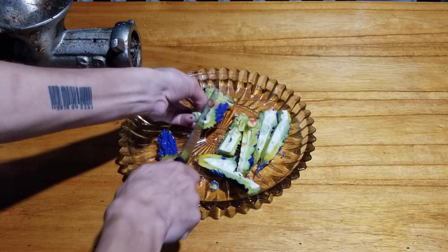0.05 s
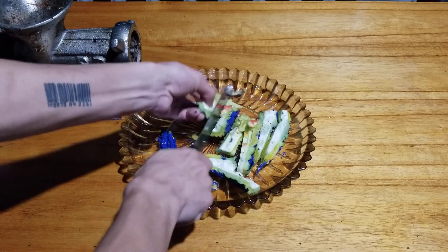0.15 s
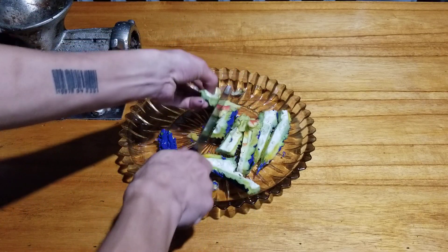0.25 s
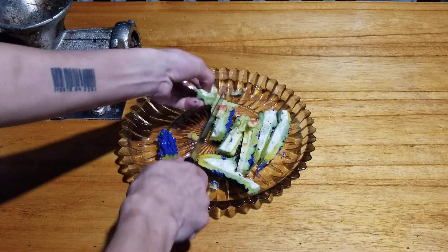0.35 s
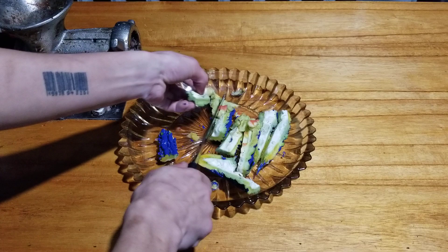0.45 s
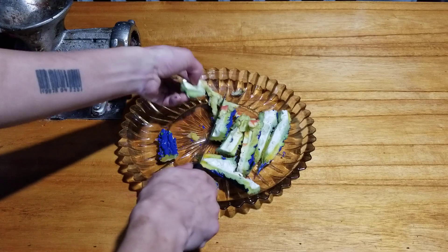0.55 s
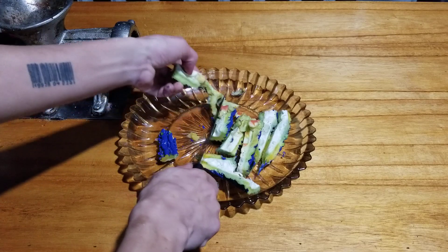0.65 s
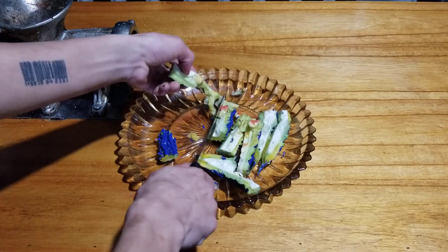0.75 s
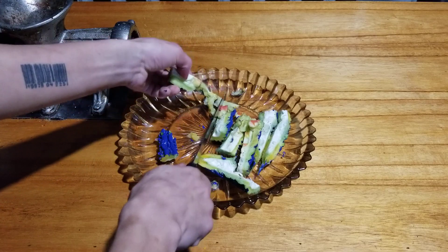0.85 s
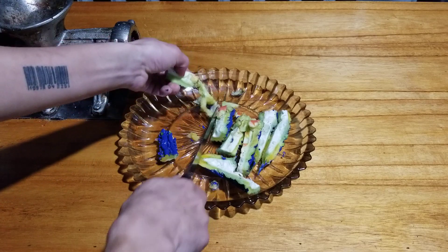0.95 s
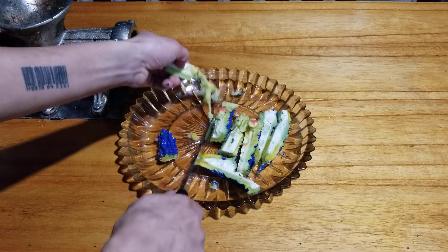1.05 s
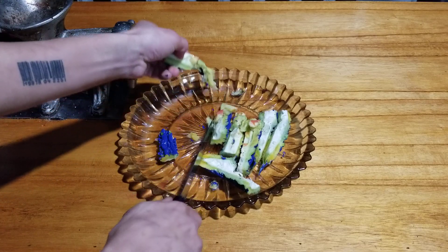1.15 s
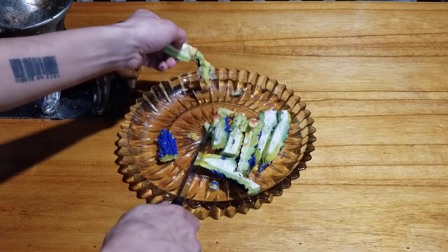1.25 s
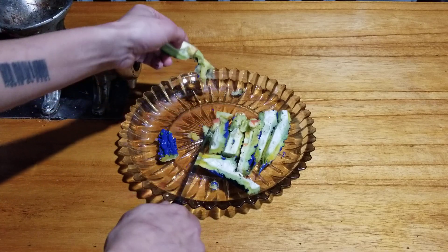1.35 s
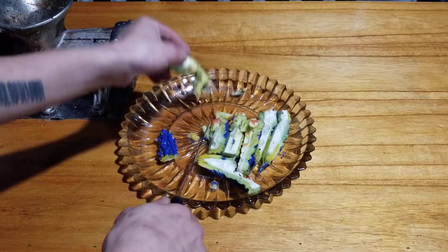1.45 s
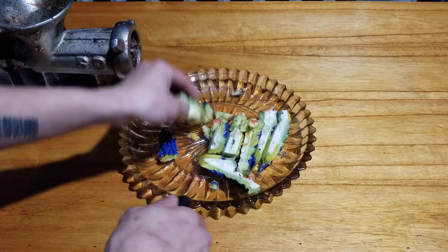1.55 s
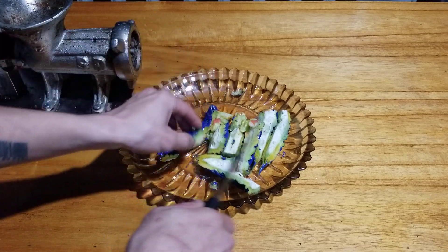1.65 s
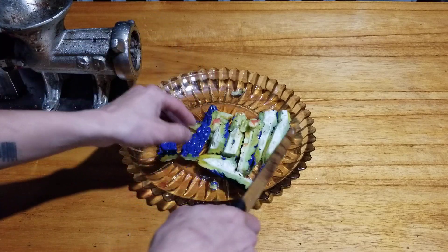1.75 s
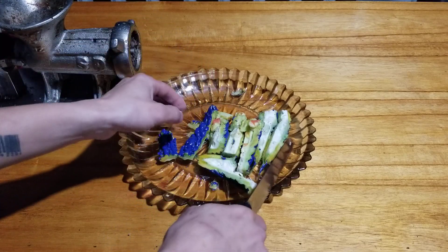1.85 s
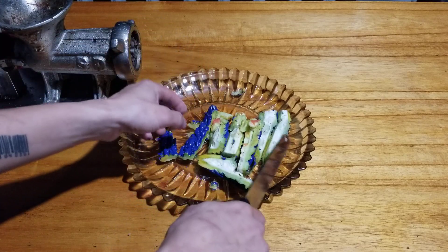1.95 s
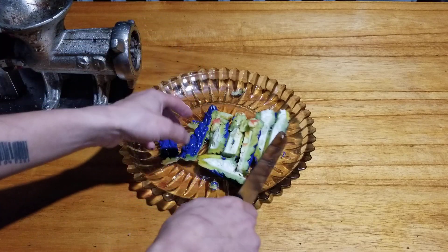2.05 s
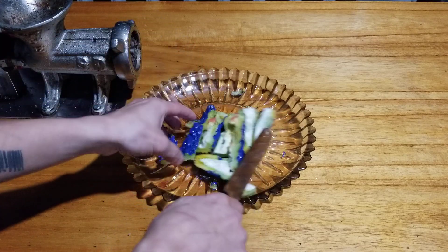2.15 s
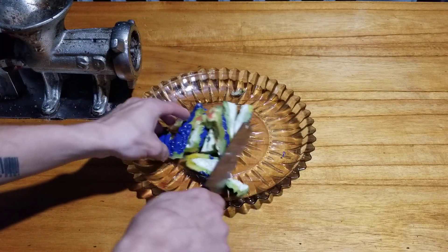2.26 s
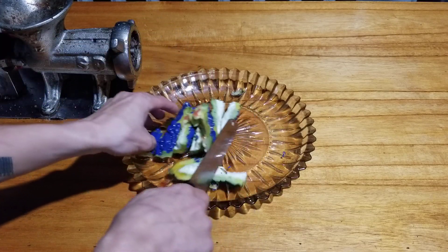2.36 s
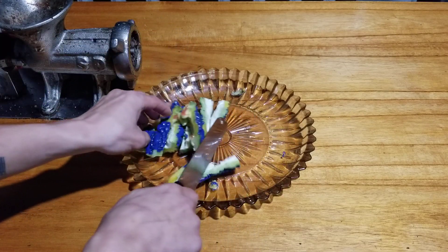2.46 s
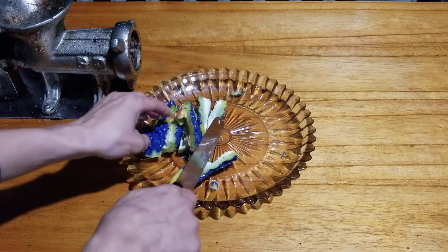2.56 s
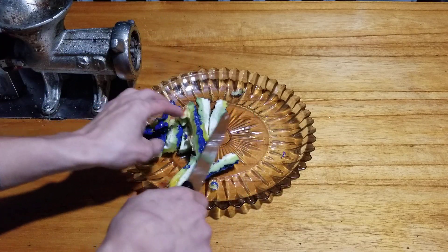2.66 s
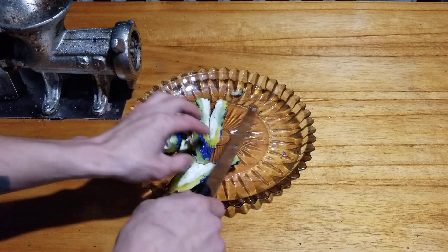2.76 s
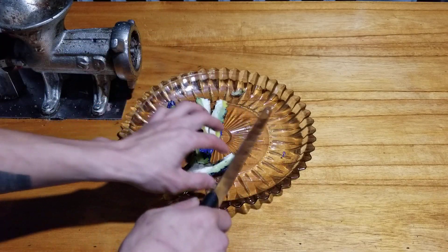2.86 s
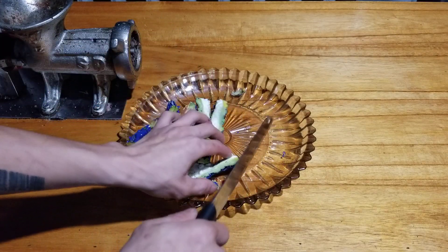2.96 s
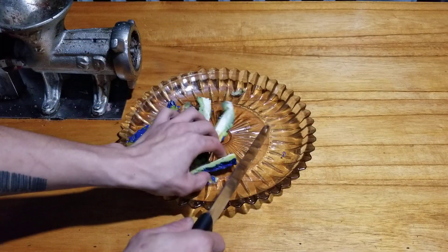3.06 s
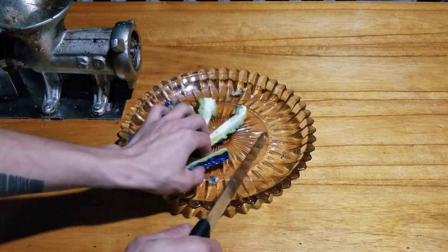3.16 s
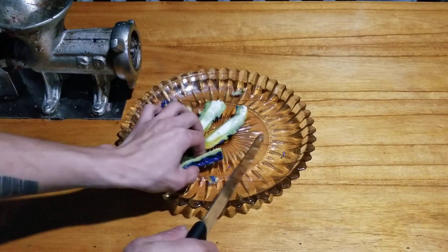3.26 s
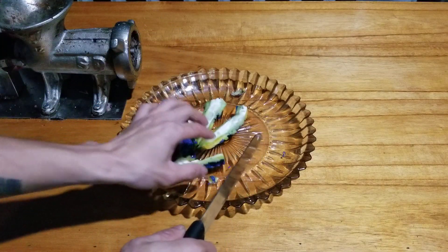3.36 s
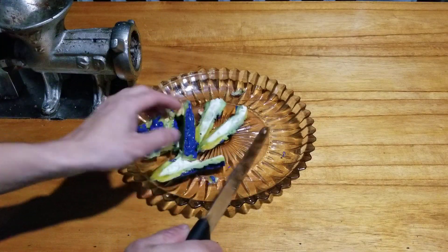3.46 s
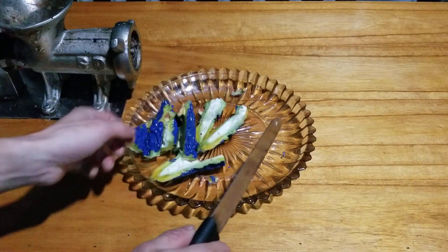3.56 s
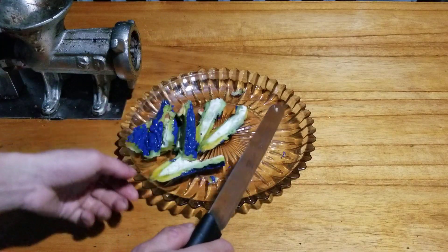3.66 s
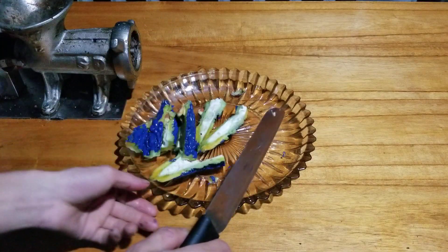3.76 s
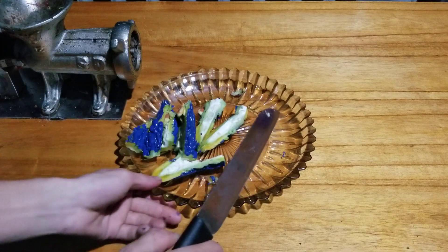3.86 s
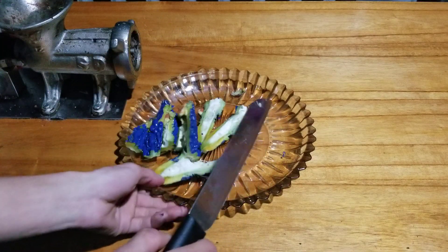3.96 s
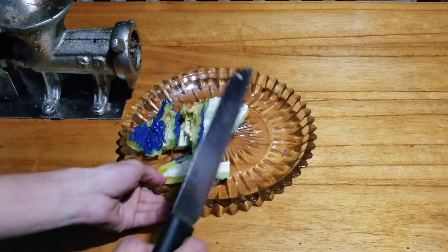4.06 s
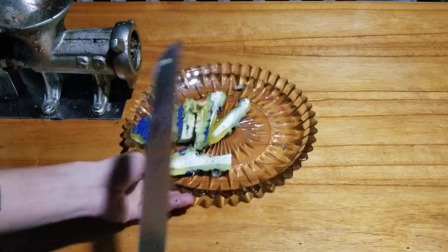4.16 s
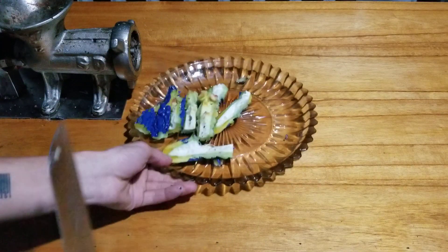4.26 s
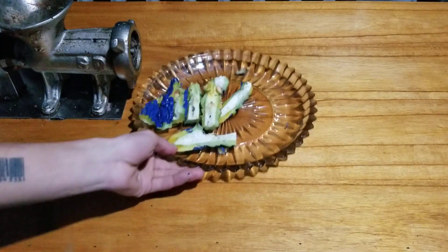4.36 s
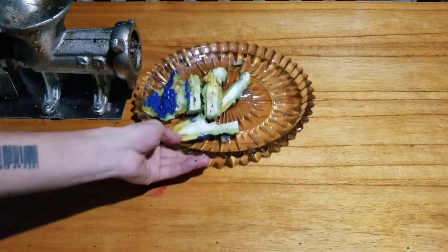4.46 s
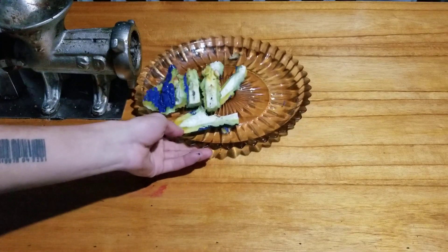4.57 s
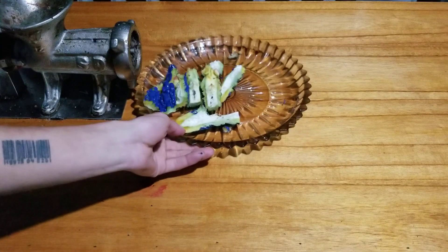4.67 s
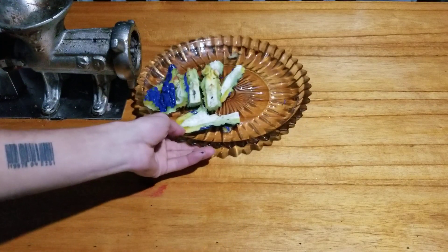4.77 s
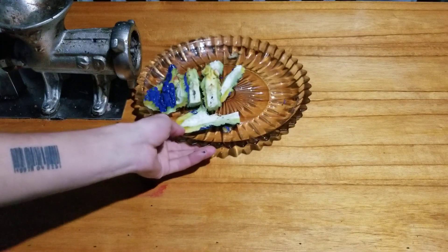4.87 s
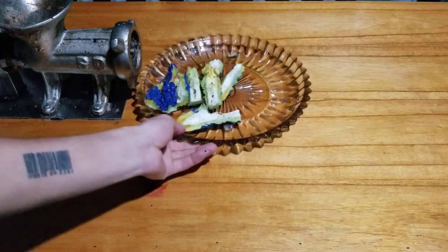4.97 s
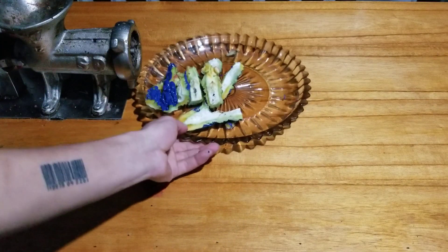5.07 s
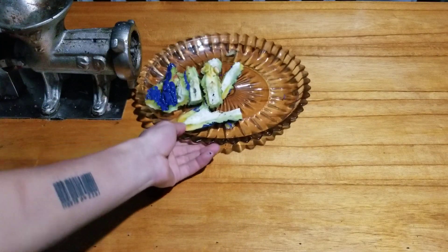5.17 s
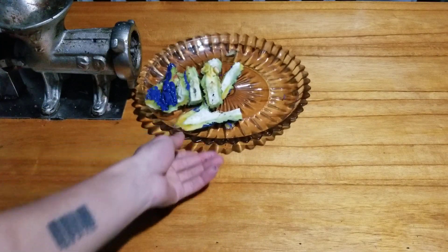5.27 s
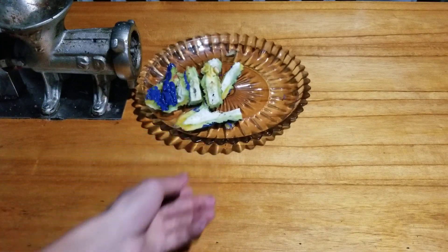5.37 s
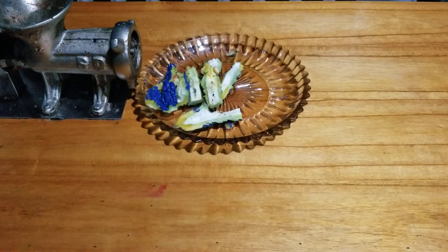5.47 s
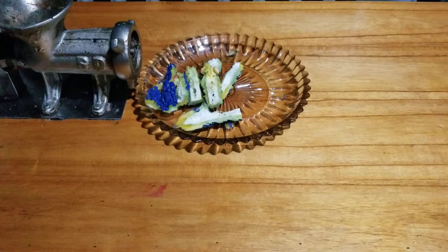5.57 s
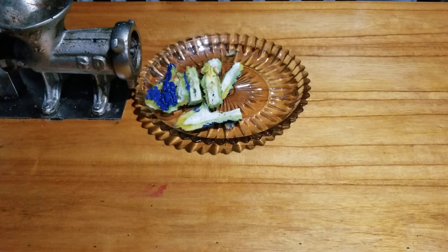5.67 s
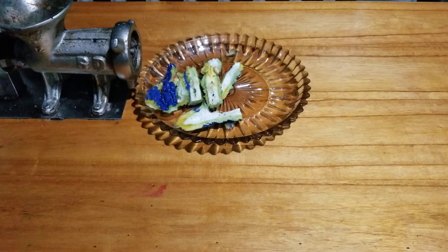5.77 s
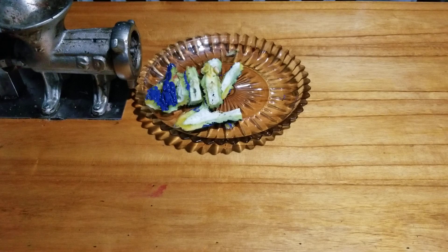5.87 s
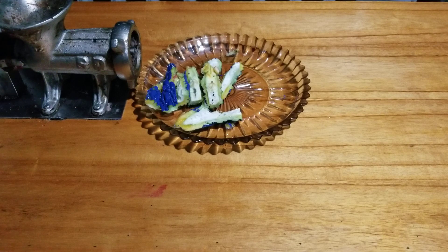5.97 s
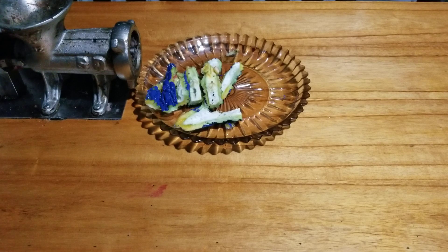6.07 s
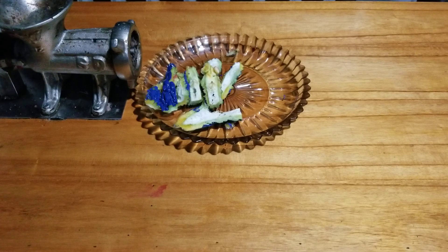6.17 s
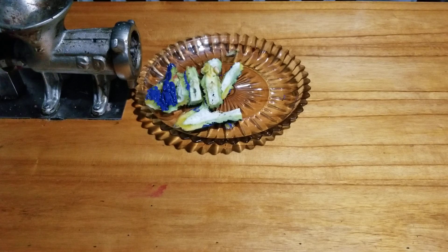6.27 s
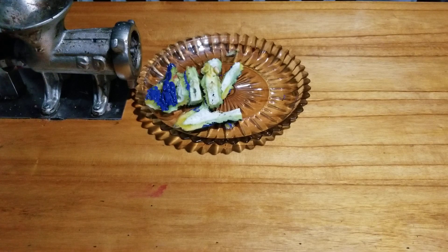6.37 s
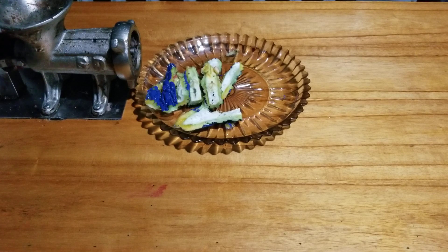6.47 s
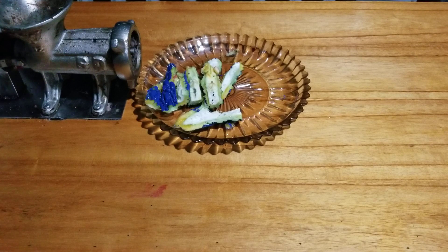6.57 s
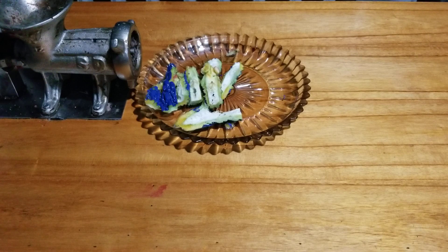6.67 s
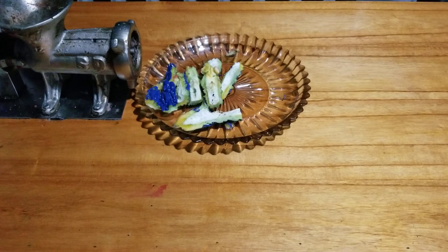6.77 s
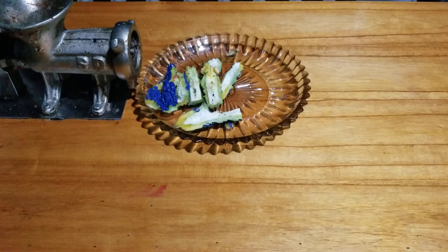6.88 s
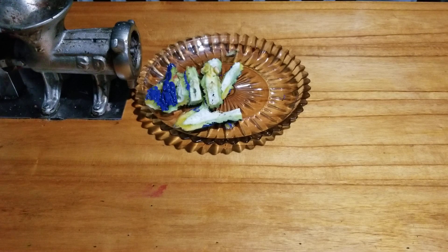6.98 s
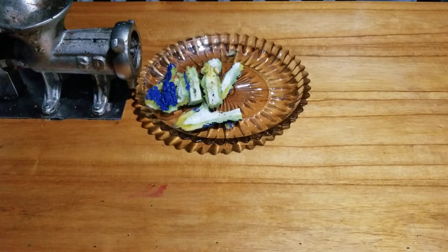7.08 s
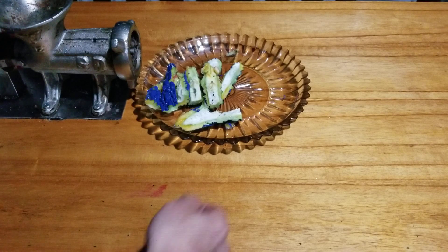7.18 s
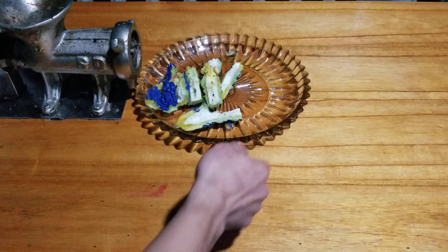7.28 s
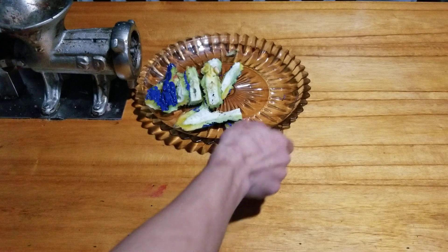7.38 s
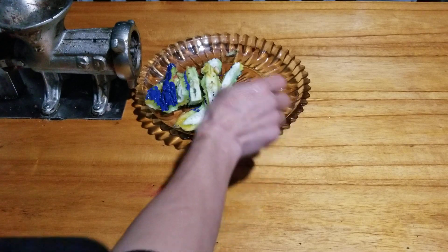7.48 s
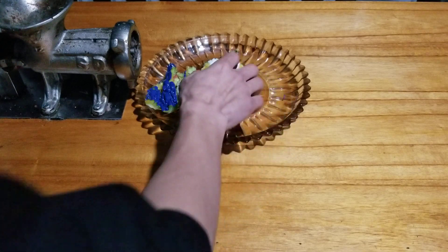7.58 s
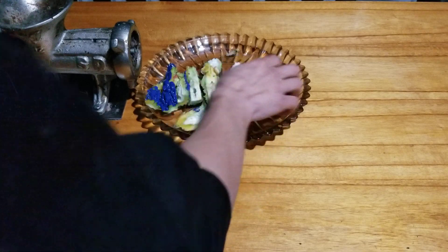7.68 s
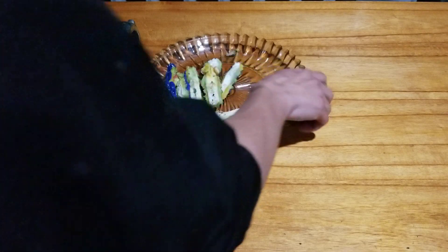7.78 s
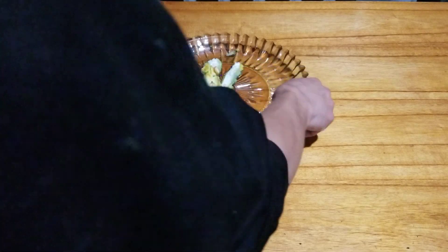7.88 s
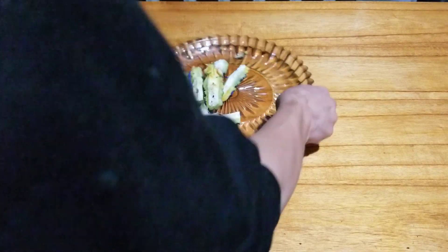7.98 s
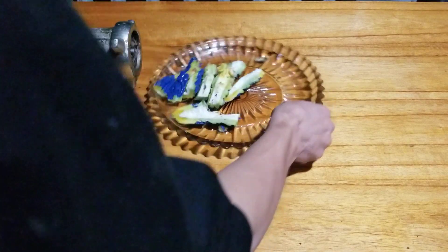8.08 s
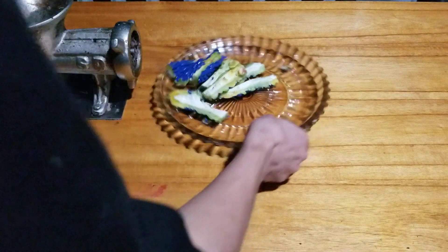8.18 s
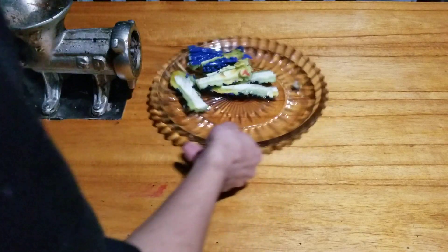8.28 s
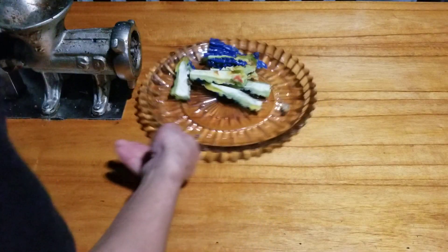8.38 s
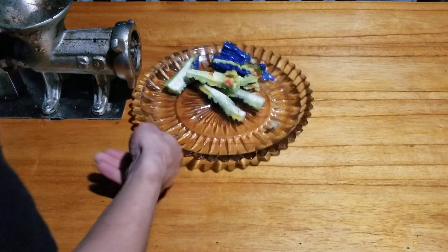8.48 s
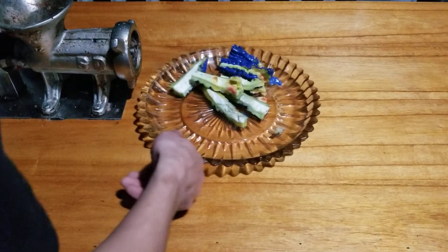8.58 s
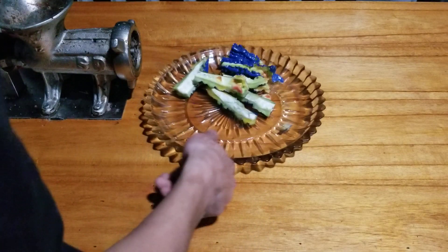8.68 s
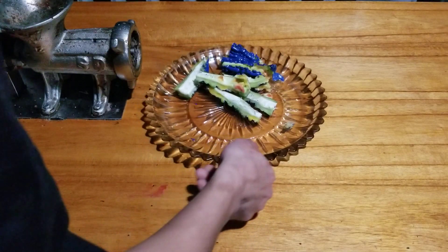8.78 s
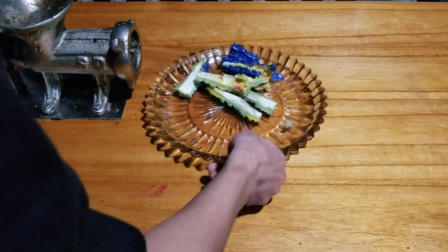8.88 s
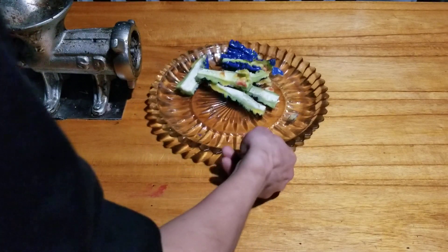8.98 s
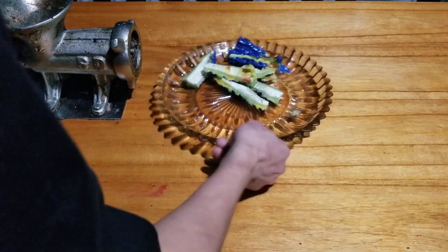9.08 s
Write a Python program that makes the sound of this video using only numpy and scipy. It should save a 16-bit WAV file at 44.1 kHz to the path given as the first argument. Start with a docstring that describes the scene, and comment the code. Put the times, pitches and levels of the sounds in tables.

```python
"""A bright clink opens the scene: a knife cuts through vegetables onto a pressed-glass plate.
In a quiet kitchen the plate is pushed aside on its wooden table and the knife is laid down; then the
plate is dragged round, juddering by stick-slip friction, and bumps to a stop. Each impact excites
damped modes of the table top and of the glass or the blade, and the small room reverberates."""
import sys
import numpy as np
from scipy import signal
from scipy.fft import rfft, irfft, next_fast_len
from scipy.io import wavfile
from scipy.ndimage import uniform_filter1d

SR = 44100
rng = np.random.default_rng(int(sys.argv[2]) if len(sys.argv) > 2 else 0)


def wav_out(sig):
    """Save sig, one row per channel (or a flat mono array), as 16-bit PCM at SR to the path in sys.argv[1]."""
    wavfile.write(sys.argv[1], SR, np.round(np.clip(np.atleast_2d(sig).T, -1, 1) * 32767).astype(np.int16))


N = 403074
T = np.arange(24000) / SR  # time axis of one short sound [s]

# Levels are relative. A strike point favours the modes near its "spot" frequency by its "spot gain".
# blade meets plate: (time [s], glass ring [dB], table boom [dB], wood knock [dB], clack [dB],
# tick [dB], spot [Hz], spot gain [dB])
CUTS = [(0.0995, -16.5, -31.5, -23.5, -34, -32.5, 3450, 2.5), (1.0, -57.5, -64, -60.5, -66, -75, 2170, -1),
        (1.895, -39.5, -38, -42, -45, -43, 2610, 16), (2.007, -47.5, -47, -56, -70, -62, 3350, 7),
        (2.161, -38.5, -42.5, -57, -68, -49.5, 3500, 13.5), (4.187, -49, -36.5, -37, -54, -53, 1000, 4)]
# bumps on the table, mostly the plate, though the thud at 7.841 s is a body knocking against it: (time [s],
# force [dB], ring over knock [dB], spot [Hz], spot gain [dB])
PLATE_BUMPS = [(2.975, -55.5, -17.5, 310, 5), (4.286, -35, -29, 487, 4.5), (4.574, -24.5, -7, 3100, 12),
               (5.183, -36, -11.5, 3110, 15), (7.841, -31, -30, 233.5, 19.5), (8.038, -31.5, -24, 380, 9.5),
               (8.117, -32.5, -20.5, 465, -1), (8.184, -24, -33, 900, 5), (8.241, -18, -34, 500, 2),
               (8.292, -19, -19.5, 790, 9), (8.331, -16.5, -22.5, 900, 1), (8.389, -20.5, -15, 510, 7),
               (8.444, -15.5, -2.5, 3060, 12), (8.457, -10, -9, 2880, 10), (8.500, -12.5, -9, 3700, 5),
               (8.511, -11.5, -12, 1290, 28), (8.526, -17, -13, 312, 8), (8.971, -41, -24, 885, -6)]
# knife clicks in the hand, then is laid down: (time [s], blade ring [dB], wood knock [dB],
# handle clack [dB], tick [dB], spot [Hz], spot gain [dB], left over right [dB])
KNIFE_TAPS = [(3.773, -52.5, -63, -39.5, -62, 2200, 1, 2), (5.9641, -40.5, -46, -45.5, -51.5, 980, 13.5, 2),
              (6.145, -39.5, -36.5, -61, -43, 565, 0, -3), (6.168, -40.5, -46.5, -48, -44.5, 1120, 2, 5.5),
              (6.267, -36, -35.5, -49, -32.5, 5680, 13, 11), (6.276, -28.5, -33.5, -22.5, -45, 666, 19, 2),
              (6.297, -36.5, -28.5, -45, -30.5, 11400, 8.5, 3)]
# pushes that slide the plate: (start [s], hardest moment [s], end [s], peak force [dB])
PUSHES = [(4.04, 4.206, 4.25, -39.5), (4.29, 4.396, 4.57, -34), (8.02, 8.1, 8.18, -34),
          (8.189, 8.37, 8.425, -18), (8.838, 8.904, 8.97, -47.5), (9.078, 9.106, 9.2, -43.5)]
# brushes of blade, vegetables and hands: (time [s], time to fall 30 dB [s], level [dB], centre [Hz])
BRUSHES = [(0.048, 0.16, -42, 4400), (0.969, 0.2, -63.5, 5000), (1.512, 0.29, -53, 4330),
           (1.93, .12, -62, 12000), (2.179, 0.18, -56, 8000), (3.605, 0.33, -52.5, 1090),
           (4.95, 0.4, -58.5, 4600), (5.08, 0.054, -47.5, 1890), (5.324, 0.22, -52.5, 5450),
           (5.48, 0.18, -52, 7500), (6.037, 0.3, -48.5, 6300), (7.47, 0.2, -54.5, 3870),
           (7.865, 0.28, -59, 7400), (7.981, 0.12, -48.5, 2900)]
# hands lean and shift on the table: (start [s], end [s], level [dB])
HAND_SPELLS = [(0, 1.6, -65.5), (1.7, 3.6, -59), (4.15, 5.6, -54.5), (7.95, 8.92, -50)]
# the background dips and returns: (time [s], level [dB])
BACKGROUND_LEVEL = [(0, 3.5), (.85, -6.5), (1.699, 2), (3.4, 2), (5.8, 4.5), (8.2, 2.5), (8.7, -4.5)]

# modes of plate, knife and table top (above its lowest): (frequency [Hz], level [dB], t60 [s])
GLASS_MODES = [(791, -6, 0.29), (1259, -7.5, 0.29), (1893, 3.5, 0.18), (2086, -0.5, .32), (2610, -13, 0.17),
               (2913, -8.5, 0.16), (3060, 0, 0.069), (3365, 1, 0.16), (3280, -14.5, 0.21),
               (3640, -1.5, 0.096), (4270, -8, 0.24), (4870, -9, .2), (4970, -3, 0.097), (5170, -9, .2),
               (5280, -5.5, 0.18), (5480, -7, 0.25), (6430, -12.5, 0.19), (7000, -4, 0.46),
               (8280, -5.5, 0.39), (8860, -4.5, 0.083), (11400, -6.5, .2), (11700, -10.5, 0.24),
               (13000, -10.5, .2), (14200, -8, 0.12)]
STEEL_MODES = [(564, 9, 0.5), (667, -1.5, 0.26), (972, -10, 0.76), (1070, 4.5, 0.45), (2180, 5.5, 0.3),
               (3390, 0.5, 0.25), (2760, 3.5, 0.16), (5020, 2, 0.3), (5600, -0.5, 0.16), (6360, 3.5, 0.18),
               (7300, -6, 0.24), (9900, -1, 0.091), (10500, -5, 0.14), (11280, -3, 0.17), (12000, 0, .19),
               (13600, 4, .17), (14400, -9, .17)]
WOOD_MODES = [(170.2, -4, 0.17), (195.8, -11, 0.5), (234.4, -5.5, 0.43), (275, -4.5, 0.26),
              (307.6, 2.5, 0.17), (341.6, -6.5, 0.31), (385.5, -1.5, 0.22), (436, -7, 0.28),
              (478, -1, 0.18), (502.4, -2.5, 0.23), (555.7, -5.5, 0.27), (605, -9.5, 0.15),
              (692, -10, 0.26), (719, -9.5, 0.27), (831, -14.5, 0.3), (862, -10.5, .28), (927, -9.5, 0.27),
              (1149, -19.5, 0.35)]
# spectra of the dense, unresolved modes in each contact sound: (frequency [Hz], density [dB])
KNOCK_SPECTRUM = [(40, -44.5), (80, -14.5), (170, -4), (250, -5), (340, 0), (500, -10), (800, -18),
                  (1200, -21.5), (2000, -32), (5000, -58), (16000, -87.5)]
CLACK_SPECTRUM = [(100, -32.5), (400, -10), (900, 2), (1400, 2), (2200, -3.5), (3200, -10), (4500, -18),
                  (8000, -33.5), (16000, -43)]
CHINK_SPECTRUM = [(300, -31.5), (1500, -29.5), (2000, -4.5), (3200, 8), (3900, -0.5), (4500, -11.5),
                  (5600, -13), (7000, -14), (9000, -23.5), (16000, -46)]
TICK_SPECTRUM = [(500, -24.5), (3000, -7), (7000, 4), (9500, -3.5), (12300, 2), (15000, -1.5),
                 (16500, -10.5)]
GRIT_SPECTRUM = [(300, -9), (1200, -1.5), (2200, 0), (3400, -2.5), (4500, -6.5), (8000, -14.5),
                 (12000, -26), (16000, -36)]
# spectra of the room's noise and the hands' rumble: (frequency [Hz], density [dB])
ROOM_SPECTRUM = [(15, -52.5), (25, -13), (111, -3.5), (145, -9.5), (212, -12.5), (285, -21), (335, -14.5),
                 (384, -18.5), (734, -16), (1700, -15.5), (2000, -12.5), (2990, -11), (3620, -18.5),
                 (4030, -17.5), (16000, -36)]
HAND_SPECTRUM = [(15, -26.5), (35, -5.5), (80, -11.5), (118, 1.5), (170, -13), (300, -16), (700, -16.5),
                 (2000, -49)]
# likeness of the sound at the two ears: (frequency [Hz], correlation [0-1])
COHERENCE = [(30, 1), (120, 0.95), (300, 0.97), (600, 0.6), (1200, 0.03), (3000, 0.048), (16000, .1)]


def gain_of(db):
    """Amplitude grows tenfold for every 20 dB."""
    return 10 ** (np.asarray(db) / 20)


def value_at(points, hz):
    """Interpolation of a table on a logarithmic frequency axis."""
    table_hz, value = np.transpose(points)
    return np.interp(np.log(hz + 1), np.log(table_hz + 1), value)


def unit_rms(x):
    """Normalisation to unit mean power."""
    return x / np.sqrt(np.mean(x ** 2) + 1e-20)


def unit_hit(x):
    """Normalisation to unit mean power over the first 40 ms."""
    return x / np.sqrt(np.mean(x[:, :SR // 25] ** 2) + 1e-20)


def steadied(x, seconds):
    """Division by the running rms removes slow swells and keeps fast judder."""
    power = uniform_filter1d((x ** 2).mean(0), int(seconds * SR))
    return x / np.sqrt(abs(power) + 1e-12)


def add(mix, start, sound):
    """Superposition: a stereo sound joins the mix at its start time."""
    part = mix[:, max(round(start * SR), 0):][:, :sound.shape[1]]
    part += sound[:, :part.shape[1]]


def pan(left_db):
    """A level difference between the ears places a source to one side."""
    return gain_of(np.array([[left_db], [-left_db]]) / 2)


def noise(spectrum, length):
    """Diffuse noise is coherent between the ears only at long wavelengths."""
    size = next_fast_len(length)
    hz = np.fft.rfftfreq(size, 1 / SR)
    left, independent = rfft(rng.standard_normal((2, size)))
    coherence = value_at(COHERENCE, hz)
    right = coherence * left + np.sqrt(1 - coherence ** 2) * independent
    coloured = np.array([left, right]) * gain_of(value_at(spectrum, hz))
    return unit_rms(irfft(coloured, size)[:, :length])


def background(hiss_db=-58.5, whine_hz=3990, whine_db=-71.5, flicker_db=0.5, flicker_s=0.13):
    """Broadband noise is heard as room rumble and hiss, a narrow band as a thin, flickering whine."""
    band = [(.93, -90), (.975, -7), (1, 0), (1.025, -7), (1.07, -90)]
    whine = noise([(whine_hz * ratio, db) for ratio, db in band], N)
    flicker = unit_rms(uniform_filter1d(rng.standard_normal(N), int(flicker_s * SR)))
    air = gain_of(hiss_db) * noise(ROOM_SPECTRUM, N) + gain_of(whine_db + flicker_db * flicker) * whine
    level_db = np.interp(np.arange(N) / SR, *np.transpose(BACKGROUND_LEVEL))
    return air * gain_of(level_db) * pan(2.9)


def handling(fade_s=0.51):
    """Structure-borne noise: a low rumble fades in and out as the hands work on the table."""
    t = np.arange(N) / SR
    weight = sum(gain_of(db) * (t >= start) * (t < end) for start, end, db in HAND_SPELLS)
    return uniform_filter1d(weight, int(fade_s * SR)) * noise(HAND_SPECTRUM, N)


def brushing(rise_s=0.026, graininess=0.15):
    """Light friction makes grainy swishes of noise that swell and fade."""
    out = np.zeros((2, N))
    for start, decay_s, db, hz in BRUSHES:
        envelope = np.minimum(T / rise_s, 1) ** 2 * gain_of(-30 * np.maximum(T - rise_s, 0) / decay_s)
        grains = np.exp(graininess * unit_rms(uniform_filter1d(rng.standard_normal(len(T)), size=60)))
        swish = noise([(hz / 10, -22), (hz / 2, -5), (hz, 0), (hz * 2, -9), (hz * 4, -22)], len(T))
        add(out, start, gain_of(db) * envelope * grains * swish)
    return out * pan(1.5)


def burst(spectrum, direct_t60, room_db, room_t60):
    """Overlapping modes merge into a crack of noise; direct and reverberant powers add."""
    power = gain_of(-120 * T / direct_t60) + gain_of(2 * room_db - 120 * T / room_t60)
    attack = 1 - np.exp(-T / 0.00028)
    return unit_hit(noise(spectrum, len(T)) * np.sqrt(power) * attack)


def ring(modes, corner_hz, spot_hz=1, spot_db=0, scatter_db=3.0, blur=0.65, bite=0):
    """Free vibration is a sum of damped modes: soft contact dulls them, reflections blur them."""
    hz, db, t60 = np.transpose(modes)
    near_spot = np.exp(-(np.log(hz / spot_hz) / 0.076) ** 2)
    db = db + scatter_db * rng.standard_normal(len(hz)) + spot_db * near_spot
    amplitude = gain_of(db) / np.sqrt(1 + (hz / corner_hz) ** 4)
    ear_phase = np.arccos(value_at(COHERENCE, hz)) * rng.choice([-1, 1], len(hz)) / 2
    weights = amplitude * rng.choice([-1, 1], len(hz)) * np.exp(1j * np.array([ear_phase, -ear_phase]))
    phase = 2 * np.pi * hz[:, None] * T
    decay = gain_of(-60 * T / t60[:, None])
    direct = unit_hit(weights.real @ (np.sin(phase) * decay) + weights.imag @ (np.cos(phase) * decay))
    room = rng.standard_normal(direct.shape, dtype=np.float32) * np.exp(-T / 0.059)
    reflected = irfft(rfft(direct * np.exp(-T / 0.0054)) * rfft(room))
    # pressed contact quickly damps the first, strongest cycles
    onset = 1 + bite * np.exp(-T / 0.018)
    return unit_hit(direct * onset + blur * unit_hit(reflected))


def table_boom(hz, room_hz=129):
    """The table top's fundamental mode swells and dies; a room resonance outlasts it."""
    fundamental = np.sin(2 * np.pi * hz * T) * gain_of(-60 * T / 0.19)
    room = np.sin(2 * np.pi * room_hz * T) * gain_of(-14 - 60 * T / 0.54) * (1 - np.exp(-T / 0.05))
    attack = 1 - np.exp(-T / 0.0062)
    return unit_hit(np.array([fundamental + room] * 2) * attack)


def table_knock(spot_hz, spot_db, dense_db):
    """The table top's higher modes, distinct and overlapping, sound together as a knock."""
    distinct = ring(WOOD_MODES, 1500, spot_hz, spot_db, blur=0.13) * (1 - np.exp(-T / 0.00067))
    dense = burst(KNOCK_SPECTRUM, 0.099, -0.5, 0.42)
    return unit_hit(distinct + gain_of(dense_db - spot_db / 2) * dense)


def impact(modes, ring_db, boom_db, wood_db, clack_db, tick_db, spot_hz, spot_db, *,
           boom_hz, corner_hz, pan_db, chink_db, fizz_db, fizz_room_db, blur, bite):
    """An impulse excites both bodies: the table booms and knocks, the object rings and ticks."""
    knock = gain_of(wood_db) * table_knock(spot_hz, spot_db, dense_db=0.5) * pan(1.9)
    table = gain_of(boom_db) * table_boom(boom_hz) + knock
    low_modes = [mode for mode in modes if mode[0] < 6000]
    high_modes = [mode for mode in modes if mode[0] >= 6000]
    chime = ring(low_modes, corner_hz, spot_hz, spot_db, blur=blur, bite=bite)
    chink = gain_of(chink_db) * burst(CHINK_SPECTRUM, 0.017, -15, 0.26)
    tick = ring(high_modes, corner_hz * 2, spot_hz, spot_db, blur=blur * 0.51, bite=bite * 0.88)
    fizz = gain_of(fizz_db) * burst(TICK_SPECTRUM, 0.029, fizz_room_db, 0.24)
    clack = gain_of(clack_db) * burst(CLACK_SPECTRUM, 0.032, -12, 0.38)
    body = clack + gain_of(ring_db) * unit_hit(chime + chink)
    return table + pan(pan_db) * body + gain_of(tick_db) * unit_hit(tick + fizz)


def knife_tapping(level_db=-3, boom_over_knock_db=-4):
    """Light impacts ring the blade's bending modes and clack the handle; the table resonates below."""
    out = np.zeros((2, N))
    for start, ring_db, wood_db, clack_db, tick_db, spot_hz, spot_db, pan_db in KNIFE_TAPS:
        boom_db = wood_db + boom_over_knock_db
        hit = impact(STEEL_MODES, ring_db, boom_db, wood_db, clack_db, tick_db, spot_hz, spot_db,
                     boom_hz=129, corner_hz=7000, pan_db=pan_db,
                     chink_db=-19, fizz_db=1.5, fizz_room_db=-4, blur=0.83, bite=0.35)
        add(out, start, hit)
    return gain_of(level_db) * out


def slips(per_s, spread_db):
    """Stick-slip as a Poisson process: one second of impulses of uneven size."""
    sizes = gain_of(spread_db * np.minimum(rng.exponential(1, SR), 3)) * rng.choice([-1, 1], SR)
    return sizes * (rng.random(SR) < per_s / SR)


def plate_sliding(swell_db=16.5, ease_db=8):
    """Stick-slip friction: the plate's foot catches and jerks; boom, judder and grit follow the push."""
    grit = burst(GRIT_SPECTRUM, 0.018, -8.5, 0.23) + gain_of(-19) * ring(GLASS_MODES, 1800)
    boom = table_boom(113.5)
    judder = table_knock(spot_hz=910, spot_db=-1, dense_db=-0.5)
    out = np.zeros((2, N))
    for start, hardest, end, peak_db in PUSHES:
        t = np.arange(start - .1, end + .05, 1 / SR)
        force_db = peak_db - np.interp(t, [start, hardest, end], [swell_db, 0, ease_db])
        moving = (t > start) * (t < end)
        jerks = slips(per_s=200, spread_db=5)[:len(t)]
        grains = slips(per_s=430, spread_db=4.3)[:len(t)]
        layers = [(jerks, boom, -2, 1), (jerks, judder, 1.5, 1.157), (grains, grit, -31, 0.59)]
        for impulses, response, layer_db, force_exponent in layers:
            envelope = uniform_filter1d(gain_of(layer_db + force_exponent * force_db) * moving, size=500)
            vibration = signal.oaconvolve(impulses[None], response, axes=1)[:, :len(t)]
            add(out, t[0], envelope * steadied(vibration, seconds=0.083))
    return out * pan(0.85)


def plate_bumping(level_db=-3, full_force_hz=107, sag_hz_per_db=0.67):
    """Nonlinear contact: more force lowers the table's boom; hardness adds ring, clack and tick."""
    out = np.zeros((2, N))
    for start, force_db, hardness_db, spot_hz, spot_db in PLATE_BUMPS:
        edge_db = 0.63 * hardness_db
        hit = impact(GLASS_MODES, ring_db=hardness_db, boom_db=0.1, wood_db=0,
                     clack_db=edge_db - 3, tick_db=edge_db - 25, spot_hz=spot_hz, spot_db=spot_db,
                     boom_hz=full_force_hz - sag_hz_per_db * force_db, corner_hz=3120, pan_db=1.5,
                     chink_db=-4, fizz_db=8, fizz_room_db=8, blur=0.85, bite=0.72)
        add(out, start, gain_of(force_db) * hit)
    return gain_of(level_db) * out


def cutting(level_db=-3, firm_db=-16, firm_corner_hz=9000, brightening=0.19):
    """Contact time sets bandwidth: the harder the blade lands on the glass, the brighter the clink."""
    out = np.zeros((2, N))
    for start, ring_db, boom_db, wood_db, clack_db, tick_db, spot_hz, spot_db in CUTS:
        corner_hz = firm_corner_hz * gain_of(brightening * (ring_db - firm_db))
        hit = impact(GLASS_MODES, ring_db, boom_db, wood_db, clack_db, tick_db, spot_hz, spot_db,
                     boom_hz=117, corner_hz=corner_hz, pan_db=3.5,
                     chink_db=-8.5, fizz_db=3, fizz_room_db=-7, blur=0.99, bite=2.55)
        add(out, start, hit)
    return gain_of(level_db) * out


def scene(low_cut_hz=75):
    """The sources superpose; a low cut trims the deepest bass from the knocks and the sliding."""
    low_cut = signal.butter(4, low_cut_hz, "high", fs=SR, output="sos")
    contacts = cutting() + plate_bumping() + knife_tapping() + plate_sliding()
    return signal.sosfilt(low_cut, contacts) + brushing() + handling() + background()


def record(dry, cutoff_hz=16100):
    """Soft saturation rounds the loudest peaks; a low-pass filter limits the band."""
    rounded = dry / (1 + dry ** 12) ** (1 / 12)
    lowpass = signal.firwin(511, cutoff_hz, window=("kaiser", 9), fs=SR)
    return signal.oaconvolve(rounded, lowpass[None], "same")


dry = scene()
out = record(dry)
wav_out(out)
```